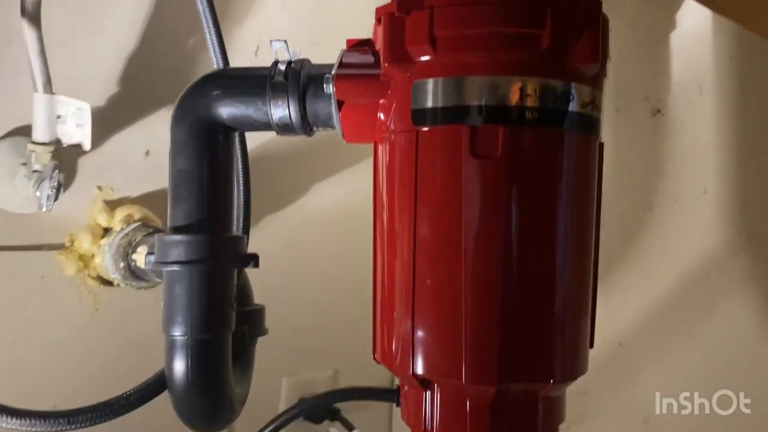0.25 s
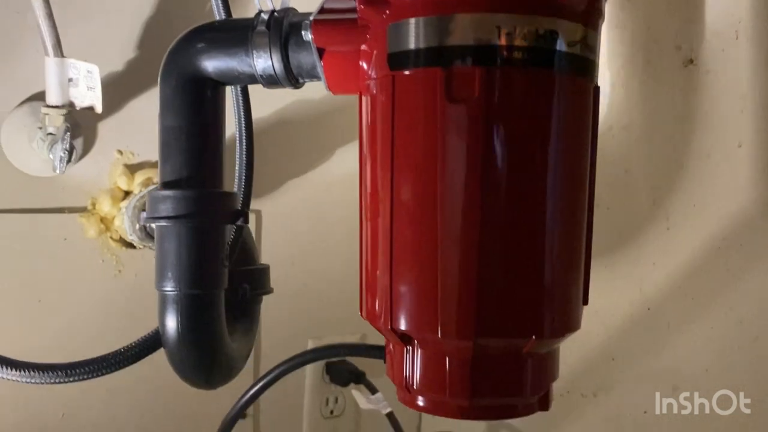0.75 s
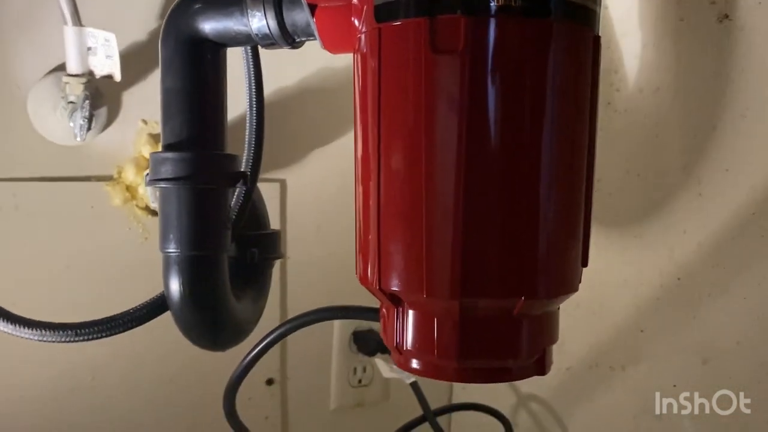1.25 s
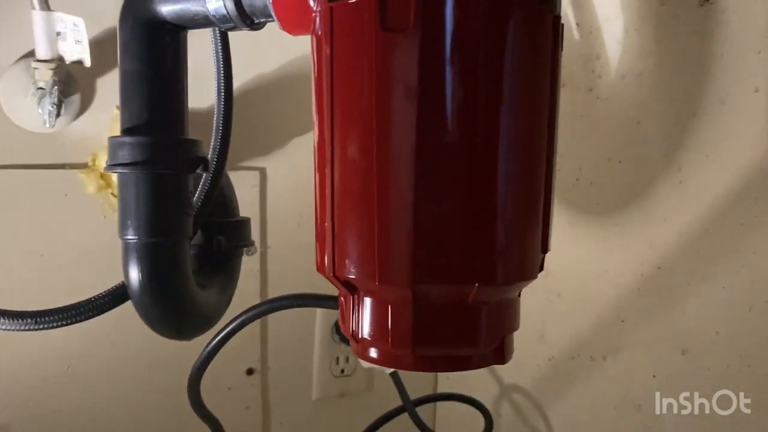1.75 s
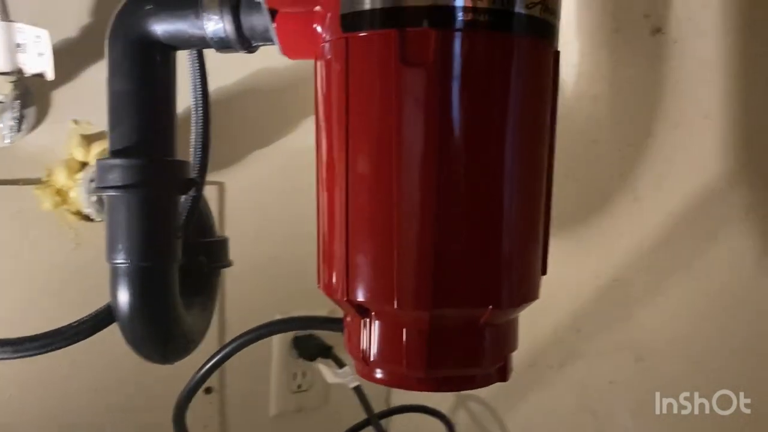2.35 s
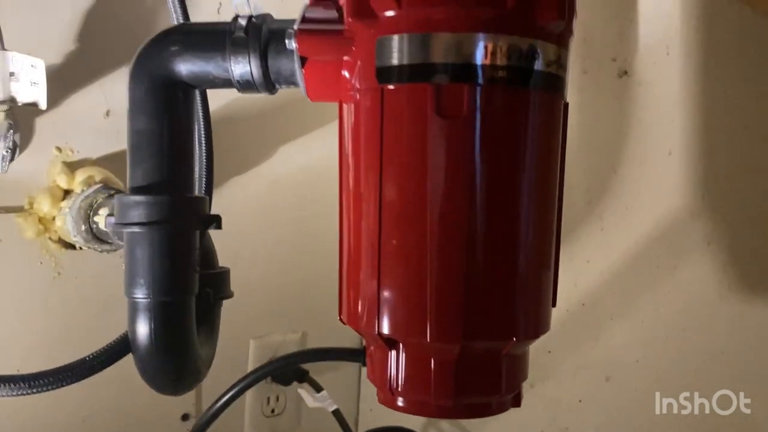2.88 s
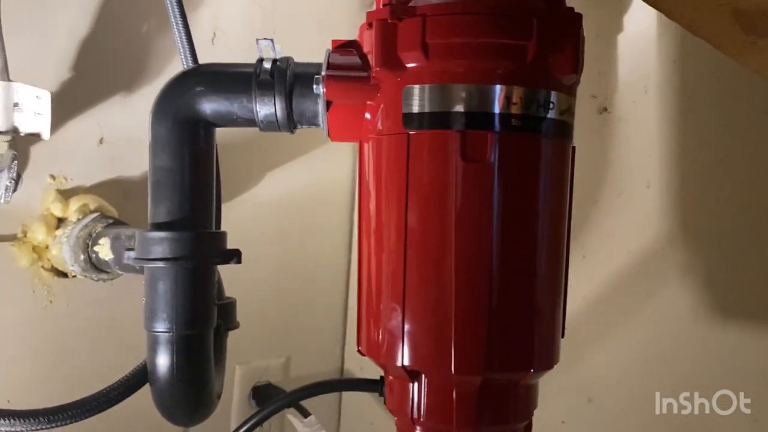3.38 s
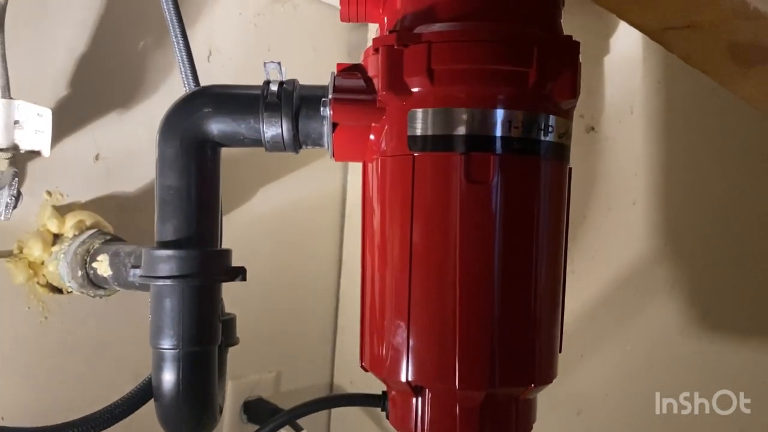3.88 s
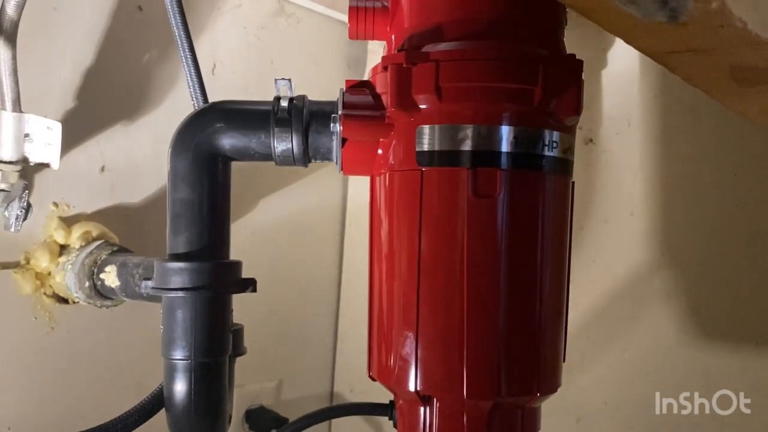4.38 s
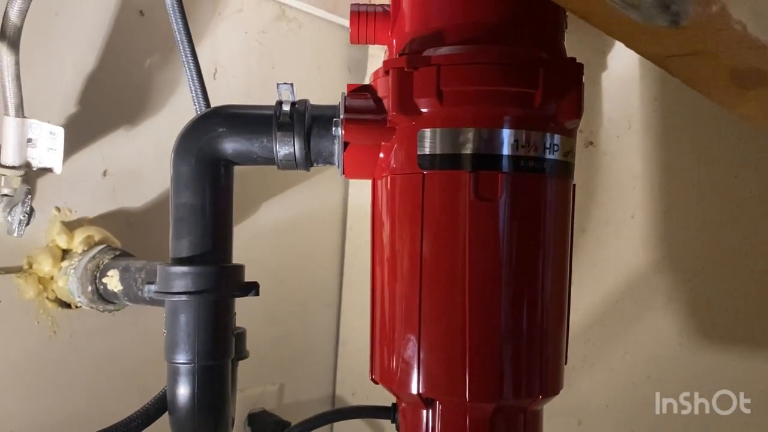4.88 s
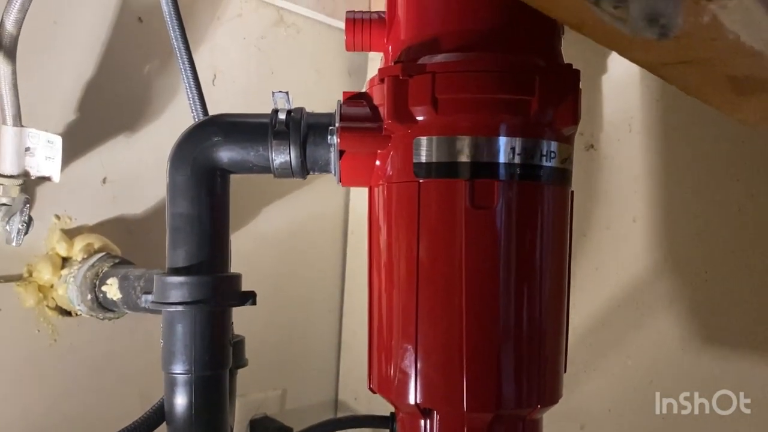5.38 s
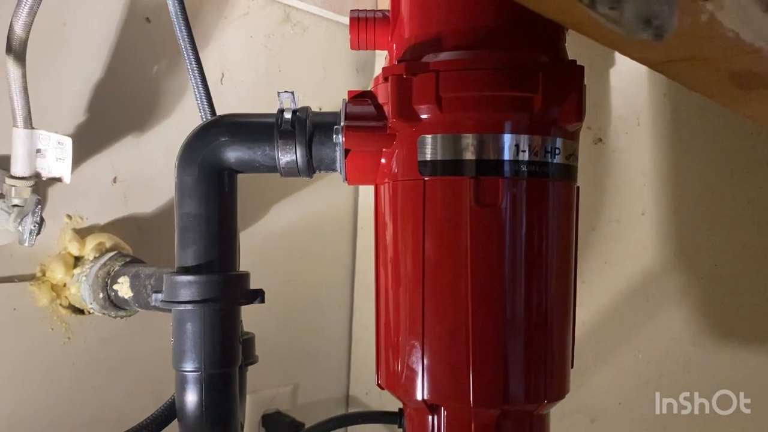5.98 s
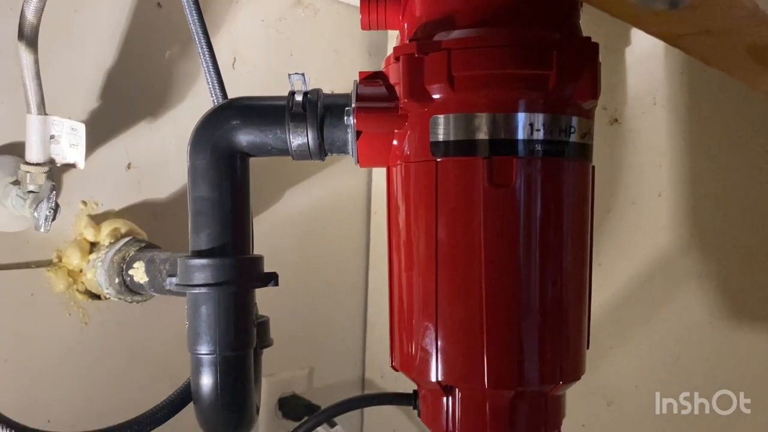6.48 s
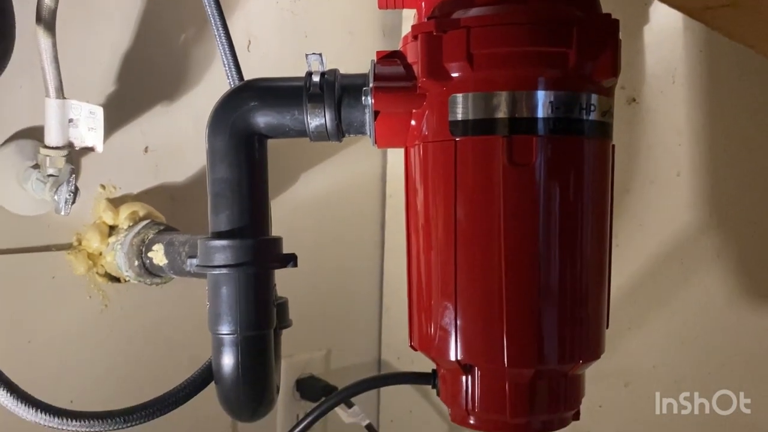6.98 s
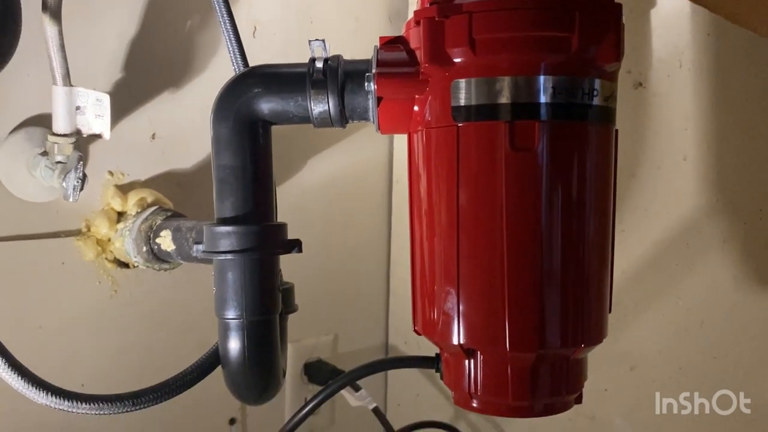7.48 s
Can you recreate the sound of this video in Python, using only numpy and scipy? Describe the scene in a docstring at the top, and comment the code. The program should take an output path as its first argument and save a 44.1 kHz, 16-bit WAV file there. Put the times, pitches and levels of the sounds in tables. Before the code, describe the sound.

From 0 s to the end near 7.7 s, a kitchen waste grinder runs continuously at nearly constant speed, heard very close in stereo inside a sink cabinet. A dominant low hum around 120 Hz throbs evenly about five times a second. Steady rotor tones sit above it, from low drones to a thin whine near 1500 Hz and higher, fluttering and shifting between sides as the microphone moves. Around 1-2.5 s, lowered towards the motor, it picks up more raspy, metallic brush noise; by 3-4 s this recedes. Water churns hollowly in the chamber with brief irregular gulps, under a constant bright rush and spray hiss that softens slightly later. A thin watery ring appears around 3.3 s. Low slugs thud down the drain, one near 2.5 s, then more frequently from 3.9 s, strongest around 5.2, 5.8 and 6.5 s, with the trap rumbling. It is still running at the end.

```python
"""Inside a kitchen sink cabinet, a waste grinder runs close to two microphones.
Its mains hum beats against the rotor's twice-a-turn push on the water and throbs about five times a second.
The rotor and its commutator whine in steady tones, and the brushes ring the motor shell with noise.
Filtered noise makes the water: it churns in the bowl, rings the chamber wall, sprays and rushes,
and drops in slugs down the drain and rumbles in the trap."""
import sys
import numpy as np
from scipy import signal
from scipy.fft import rfft, irfft
from scipy.io import wavfile
from scipy.ndimage import map_coordinates

SR = 44100
rng = np.random.default_rng(int(sys.argv[2]) if len(sys.argv) > 2 else 0)


def put_to_file(sound):
    """Save the sound as 16-bit audio at rate SR, in the file named by the first command-line argument."""
    columns = np.atleast_2d(sound).T  # one column per channel
    safe = np.clip(columns, -1, 1)
    whole_steps = np.round(safe * 32767)
    wavfile.write(sys.argv[1], SR, whole_steps.astype(np.int16))


N = 341334
T = np.arange(N) / SR
HZ = np.maximum(np.arange(N // 2 + 1) * SR / N, 1)   # 1 Hz at least, so that its logarithm exists

# path of the hand-held microphones: (time [s], height above the outlet pipe [m], sideways place [m])
MIC_PATH = [(0.0, 0.0094, -0.052), (0.5, -0.064, -0.066), (1.1, -0.13, -0.057), (1.85, -0.11, -0.074),
            (2.5, -0.097, -0.022), (3.0, -0.037, -0.012), (3.6, -0.0074, -0.0035), (4.3, 0.014, 0.014),
            (5.5, 0.0032, 0.081), (6.6, -0.025, 0.075), (7.74, -0.019, 0.065)]
# how alike the two microphones hear a sound: (frequency [Hz], likeness [-1 to 1])
MIC_LIKENESS = [(100, .98), (280, .87), (600, .58), (1250, .67), (2000, .32), (2700, .5), (3600, .42),
                (4500, .55), (5200, .12), (5900, .1), (6800, .85), (16000, .88)]


def from_db(db):
    """Turn decibels into gain."""
    return 10 ** (np.asarray(db) / 20)


def rms_one(x):
    """Scale to an average power of 1."""
    return x / np.sqrt(np.mean(x ** 2) + 1e-20)


def in_time(rows):
    """Draw straight lines between the rows of a table, giving each column at every sample."""
    s, *columns = np.transpose(rows)
    return [np.interp(T, s, c) for c in columns]


def at_hz(points, hz):
    """Read a table between its points, on a log-frequency axis."""
    f, value = np.transpose(points)
    return np.interp(np.log(hz), np.log(f), value)


def pan(lean_db):
    """Give left and right gains whose difference, left minus right, is lean_db."""
    return from_db(np.vstack([lean_db, -lean_db]) / 2)


def drift(rate):
    """Wander slowly at random around 0 with a spread of 1, changing about rate times a second."""
    step = 100   # samples between the random points
    r = np.exp(-2 * np.pi * rate * step / SR)
    noise = rng.standard_normal(N // step + 2002)
    slow = signal.lfilter([1], [1, -2 * r, r * r], noise)[2000:]   # drop the filter's start
    return np.interp(np.arange(N) / step, np.arange(len(slow)), rms_one(slow))


def swell(at_s, half_s):
    """Rise smoothly to 1 and fall again, as a bell curve."""
    return np.exp(-np.minimum(((T - at_s) / half_s) ** 2, 50))


def throb(turns, mains, left_lead):
    """Mains hum and the lugs' push lie about five hertz apart, so they swell and cancel in turn."""
    # housing shaken by the rectified mains: (multiple of the hum, level [dB], left minus right [dB])
    hum_parts = [(.5, -49, 2), (1, -25.45, 2.2), (2, -52, 1), (6, -54, 4)]
    paddle_db, paddle_db_per_m = -32.5, 10   # the push grows as the microphones rise to the grinding chamber
    lead = np.array([[left_lead], [0]])   # radians
    hum = sum(from_db(db) * pan(lean) * np.cos(2 * np.pi * k * mains + lead) for k, db, lean in hum_parts)
    height, _ = in_time(MIC_PATH)
    lug_gain = from_db(paddle_db + paddle_db_per_m * height) * pan(2.5)
    lugs = lug_gain * np.cos(2 * np.pi * 2 * turns + lead)   # two lugs push the water twice a turn
    return np.sqrt(2) * (hum + lugs)   # levels are rms


def whine(turns, mains):
    """Tones at multiples of the rotor speed, with the side tones that the pulsing supply adds."""
    # loudest tones, as the moving microphones cross their standing waves in the cabinet:
    # (multiple of the speed, multiple of the hum added):
    #     [(time [s], left level [dB], right level [dB], lead of the left phase [rad])]
    loud_tones = { (4, 0): [(0, -49, -43, 0), (1.1, -40.5, -38, .2), (2.3, -41, -39, .1),
                  (3.5, -37, -35.5, -.1), (4.5, -40, -37.5, 0), (5.7, -52, -50, .4), (6.5, -40, -42, .2),
                  (7.74, -41, -39.5, 0.055)], (5, 0): [(0, -49, -51, -.7), (2.4, -51, -61, -1.8),
                  (3.5, -36.5, -45, -.1), (4.8, -35, -43, -.1), (6.4, -33.5, -42, 0), (7.74, -39, -44, 0)],
                  (8, 0): [(0, -35, -48, -0.5), (1.8, -56, -43, 3), (2.9, -37, -60, 3),
                  (4.6, -42, -50, 0.5), (5.8, -41.5, -48, 1.5), (7.74, -42, -54, -3)],
                  (24, 0): [(0, -40, -38, .5), (.35, -45, -40, .7), (.7, -39.5, -34, 1.1),
                  (1.15, -34.5, -38.5, .8), (1.65, -33.5, -38.5, 0), (2.45, -37, -37, 1.6),
                  (3.0, -43, -35.5, 1.37), (3.7, -37.5, -37, -0.039), (4.4, -35, -36.5, -.1),
                  (6.2, -35.2, -40.5, -0.1), (7.74, -35.5, -39.5, -0.21)], (24, 1): [(0, -50, -36, 2.7),
                  (.6, -42, -40, 1.5), (.97, -39, -51, 2), (1.6, -35.7, -38, -1.5), (2.25, -37.3, -53, -.9),
                  (2.95, -52, -46, -1.5), (3.4, -42.5, -37.5, -1.5), (4.6, -41, -43, -1.4),
                  (7.74, -43.5, -42, -1)], (28, 0): [(0, -60, -49, 0), (.9, -41, -48, .3),
                  (1.9, -40, -47, .2), (2.8, -58, -52, 0), (3.7, -49, -49, -.8), (7.74, -48, -51, -.8)],
                  (36, 0): [(0, -51, -46, 3), (.5, -53, -48, 1), (1.1, -40, -37.5, -1),
                  (1.6, -42.5, -41, 0), (2.2, -42.5, -39.5, 0), (2.8, -52, -44, -2), (3.3, -41, -42, -1.5),
                  (4.4, -44, -49, -2), (5.3, -44, -60, -2.5), (7.74, -42, -58, 3)],
                  (48, 0): [(0, -61, -56, 1), (1.1, -44, -39.5, .7), (1.6, -49.5, -49, .1),
                  (2.35, -43.5, -39, 1.3), (3.1, -54, -48, 1), (4.0, -46, -44, 1.8), (5.0, -47, -45, 1.7),
                  (5.8, -42, -44.5, 1.4), (7.74, -45, -45, 1.7)], (60, 0): [(0, -56, -60, 0),
                  (3.0, -52, -57, 0), (5.2, -57, -63, 0), (6.0, -47, -58, .5), (7.74, -49, -59, .5)],
                  (96, 0): [(0, -64, -63, 0), (1.2, -44, -53, 0), (1.8, -52, -52, 0), (2.4, -48, -50, 0),
                  (3.2, -62, -61, 0), (4.9, -55, -52, 0), (7.74, -54, -57, 0)]}
    # fainter tones of the turning rotor: (multiple of the speed, level [dB], left minus right [dB])
    faint_tones = [(6, -43.5, 7), (7, -49.5, 5), (9, -54, 2), (10, -51.5, 9), (12, -56.0, 8),
                   (14, -57.0, 7), (16, -55, 9), (17, -56.0, 7), (22, -56, 3), (25, -58, 2), (29, -54.0, 7),
                   (31, -54.5, 0), (32, -53.0, 1), (33, -57, 5), (35, -58, 0), (37, -59, 6), (54, -60, 1),
                   (58, -57.5, 1), (66, -60, 3), (71, -59.5, 2), (72, -57, 0), (82, -62, 2), (95, -61, 0),
                   (120, -63, 0)]
    # fainter rotor and commutator tones, some chopped by the supply:
    # (multiple of the speed, multiple of the hum added, level [dB])
    side_tones = [(4, 1, -47), (12, 2, -54), (24, 2, -52), (24, -1, -57), (48, -1, -60), (72, -1, -61),
                  (84, 0, -61), (96, -1, -64), (240, 0, -67)]
    turn_hz = (turns[-1] - turns[0]) / T[-1]
    out = np.zeros((2, N))
    for (k, j), curve in loud_tones.items():
        left_db, right_db, lead = in_time(curve)
        level_db, lean_db = (left_db + right_db) / 2, left_db - right_db
        out += tone(k * turns + j * mains, k * turn_hz, level_db, lean_db, lead, flutter_db=0.5)
    for k, db, lean in faint_tones:
        apart = scattered(k * turn_hz, spread=2.4)
        out += tone(k * turns, k * turn_hz, db, lean, apart, flutter_db=0.8)
    for k, j, db in side_tones:
        apart = scattered(k * turn_hz, spread=2.0)
        out += tone(k * turns + j * mains, k * turn_hz, db, 1.6, apart, flutter_db=0.5)
    return out


def tone(cycles, hz, level_db, lean_db, apart, flutter_db):
    """A machine tone with a fluttering level, its phase at the left ahead by apart radians."""
    play_s = 2.2e-5 * drift(12)   # bearing play blurs the high tones most
    turned = cycles % 1 + hz * play_s + rng.random()
    phase = 2 * np.pi * turned + apart * np.array([[.5], [-.5]])
    gain = np.sqrt(2) * from_db(level_db + flutter_db * drift(5.2)) * pan(lean_db)
    return gain * np.cos(phase.astype(np.float32))


def scattered(hz, spread):
    """Wandering phase between the microphones [rad]; the less alike they hear, the more it wanders."""
    return spread * (1 - np.clip(at_hz(MIC_LIKENESS, hz), 0, 1)) * drift(0.17)


def brushes(turns):
    """Brushes scrape round the commutator and ring the motor shell."""
    # resonances of the motor shell: (frequency [Hz], width [Hz], relative level [dB])
    shell_modes = [(622, 136, 4.5), (1600, 110, 3), (1940, 30, 7), (2210, 150, 3.5)]
    shell_db, shell_db_per_m = -49, 82   # it grows as the microphones sink towards the motor
    height, _ = in_time(MIC_PATH)
    scrape = turbulence(turns, repeat=0.12, swirl=0.054)
    return from_db(shell_db - shell_db_per_m * height) * radiate(scrape, resonances(shell_modes))


def water(turns, mains):
    """Water thrown by the plate sets bowl and wall ringing, with a thin elbow ring and a hiss of spray."""
    # resonances of the water-filled bowl: (frequency [Hz], width [Hz], relative level [dB])
    bowl_modes = [(269.6, 30, 1.5), (296.5, 7.3, 2), (366, 57, 3.5), (450, 42, -1.5), (524, 93, -1),
                  (654.5, 36, -1.5), (792, 120, -10.5)]
    # the bowl's pitch shifts with the depth of water in it: (time [s], ratio to its usual pitch)
    bowl_pitch = [(0, 1.02), (1.2, 0.98), (2.1, .96), (3.0, 1.035), (4.3, 1.02), (5.5, 0.98), (7.74, 1.005)]
    # resonances of the chamber wall: (frequency [Hz], width [Hz], relative level [dB])
    wall_modes = [(925, 116, -8), (1107, 40, -0.5), (1164, 64, 3.5), (1225, 89, 3), (1292, 45, 2),
                  (1423, 150, -6), (4560, 220, -12.5)]
    # thin ring of the spray in the outlet elbow: (frequency [Hz], width [Hz], relative level [dB])
    elbow_modes = [(3365, 84, 0)]
    # level of that ring: (time [s], level [dB])
    elbow_level = [(0, -44), (.8, -56), (2.8, -73), (3.25, -43), (3.8, -46), (4.3, -52), (7.74, -46)]
    # colour of the spray hitting the housing: (frequency [Hz], relative level per Hz [dB])
    spray_colour = [(1500, 3.5), (2400, -1.5), (2750, 3.5), (3350, 3), (3950, 2.5), (4250, 1.5),
                    (4550, 0.5), (4900, -2.5), (5300, -7), (6000, -7.5), (9000, -44)]
    # colour of the even rush of water: (frequency [Hz], relative level per Hz [dB])
    rush_colour = [(20, -19), (60, -4), (200, -.5), (400, .5), (850, -2), (1900, -2), (2500, -4.5),
                   (5300, -5.3), (6200, -6), (8000, -8.5), (11000, -11.5), (16000, -12.8)]
    churn_db, ring_db, spray_db = water_levels()
    elbow_db, = in_time(elbow_level)
    _, sideways = in_time(MIC_PATH)
    surge_db = 0.36 * np.cos(2 * np.pi * (2 * turns - mains))   # churns harder on each swell of the hum

    bowl = radiate(turbulence(turns, repeat=0.01, swirl=0.093), resonances(bowl_modes))
    churn = from_db(churn_db + surge_db + 0.6 * drift(12.0)) * bend(bowl, bowl_pitch)
    wall = radiate(turbulence(turns, repeat=0.12, swirl=0.1), resonances(wall_modes))
    ring = from_db(ring_db + surge_db / 2 + 1.1 * drift(11.5)) * wall
    elbow = from_db(elbow_db) * radiate(rng.standard_normal((2, N)), resonances(elbow_modes))

    spray = radiate(splashes(depth_db=2.14, rate=24), from_db(at_hz(spray_colour, HZ)))
    spray = from_db(spray_db + 0.4 * drift(5.5)) * spray
    rush = radiate(turbulence(turns, repeat=.25, swirl=.05), from_db(at_hz(rush_colour, HZ)))
    rush = from_db(-33.2 + .45 * drift(16)) * rush
    hiss = cabinet(spray + rush, echo=0.17, top_echo=0.25, count=8)
    lean_db_per_m = 13   # the hiss leans to the left as the sideways place grows
    return churn + ring + elbow + pan(lean_db_per_m * sideways) * hiss


def water_levels():
    """Churn, wall ring and spray in dB: the slow flow, with each gulp changing the first two."""
    # slow levels: (time [s], churn in the bowl [dB], ring of the chamber wall [dB], spray [dB])
    slow_water = [(0, -32, -35, -34), (.8, -34, -35.5, -34.5), (1.9, -34.5, -38.5, -34.5),
                  (2.8, -35, -33, -35.5), (4.0, -34.5, -33, -36), (4.8, -33.5, -34.5, -36),
                  (6.4, -36, -34.5, -37.5), (7.74, -34, -34.5, -38)]
    # the plate catches a gulp of water; below 0 is a dip:
    # (time [s], rise of the churn [dB], rise of the wall's ring [dB])
    gulps = [(.27, 3, 1), (.68, 5.5, 0.5), (.92, -2, 3), (1.15, 4, 4), (1.56, 4, 1), (2.22, 4, 1),
             (2.38, 0, -1), (2.61, 3.5, 4), (3.01, 2.5, 2), (3.3, 3, -3), (3.54, 6, -1.5), (3.86, 4.5, 2),
             (4.25, 2, 1.5), (4.71, 2, -3), (5.2, 1.5, -1), (5.84, 4, 5), (6.7, -1, 4), (7.63, 5, -4)]
    churn_db, ring_db, spray_db = in_time(slow_water)
    for s, churn_rise_db, ring_rise_db in gulps:
        gulp = swell(s, half_s=0.025)
        churn_db = churn_db + churn_rise_db * gulp
        ring_db = ring_db + ring_rise_db * gulp
    return churn_db, ring_db, spray_db


def turbulence(turns, repeat, swirl):
    """Random force: a share comes round again each turn, and all of it pulses with the rotor."""
    size = 700   # random points round one turn
    place = (8 * (turns % 1 * size)).astype(int)   # eight finer steps to each point
    rings = [signal.resample(rng.standard_normal(size), 8 * size)[place] for _ in range(2)]
    pulsing = 1 + swirl * sum(np.cos(2 * np.pi * k * turns) for k in range(1, 4))
    return (rng.standard_normal((2, N)) + repeat * np.array(rings)) * pulsing


def splashes(depth_db, rate):
    """The spray comes in small uneven splashes, each frequency region flaring by itself."""
    edges = np.geomspace(1500, 16000, 9)   # Hz
    white = rfft(rng.standard_normal((2, N)))
    out = np.zeros((2, N))
    for low, high in zip(edges, edges[1:]):
        band = irfft(white * ((HZ >= low) & (HZ < high)), N)
        out += band * from_db(depth_db * drift(rate))
    return out


def bend(x, pitch):
    """Slide all the pitches of a sound together, by playing it faster or slower."""
    ratio, = in_time(pitch)
    return np.array([map_coordinates(side, [np.cumsum(ratio)], order=1, mode="mirror") for side in x])


def drain(turns):
    """Slugs of water unbalance the plate, shaking it once a turn, and thump down the pipe into the trap."""
    # resonance of the drain pipe: (frequency [Hz], width [Hz], relative level [dB])
    pipe_modes = [(64, 22, 0)]
    # resonances of the trap: (frequency [Hz], width [Hz], relative level [dB])
    trap_modes = [(85.5, 16, 1.5), (124, 41, -0.5)]
    trap_db, trap_follows = -40.5, 0.3   # the second is the share of the flow's swing in dB that it takes up
    flow = drain_flow()
    wobble = np.sqrt(2) * flow * from_db(-1.5) * pan(2.5) * np.cos(2 * np.pi * turns)
    slugs = flow * from_db(-1.0) * radiate(rng.standard_normal((2, N)), resonances(pipe_modes))
    trap_gain = from_db(trap_db) * (flow / flow.mean()) ** trap_follows
    rumble = trap_gain * radiate(rng.standard_normal((2, N)), resonances(trap_modes))
    return wobble + slugs + rumble


def drain_flow():
    """Strength of the flow down the drain: an uneven trickle, with slugs on top."""
    # flow between slugs, before its waver: (time [s], level [dB])
    trickle_level = [(0, -49), (1.2, -48), (2.0, -45), (3.0, -44), (4.0, -44.5), (6.5, -48), (7.74, -43)]
    # slugs of water drop down the drain: (time [s], peak level before the trim below [dB])
    slug_peaks = [(0.52, -46), (2.51, -37), (3.9, -43), (4.28, -40), (4.85, -39), (5.19, -33), (5.56, -41),
                  (5.84, -32), (6.08, -36), (6.5, -31), (6.77, -41), (7.35, -43)]
    trim_db = -2
    trickle_db, = in_time(trickle_level)
    trickle = from_db(trickle_db + 0.5 * drift(5))
    slug_power = sum(from_db(db + trim_db) ** 2 * swell(s, half_s=0.058) for s, db in slug_peaks)
    return np.sqrt(trickle ** 2 + slug_power)


def resonances(modes):
    """Gain at each frequency of a set of steep-sided resonances, their powers added."""
    power = 0
    for hz, width, db in modes:
        peak = from_db(db) / (1 + (2 * (HZ - hz) / width) ** 2)
        power = power + peak ** 2
    return np.sqrt(power)


def radiate(force, gain):
    """Colour two random forces and mix them so the microphones hear each frequency more or less alike."""
    # loudness between the sides: (frequency [Hz], left minus right [dB])
    side_lean = [(60, 2), (250, 1.5), (400, 3.5), (700, 7), (1200, 4), (1800, 2.2), (3000, 1.6),
                 (6000, 0.2), (16000, 0)]
    lag_above_hz, left_lag_s = 7020, .000242   # the top reaches the left microphone a little later
    mid, side = rfft(force) * gain
    alike = np.clip(at_hz(MIC_LIKENESS, HZ), -1, 1)
    both = np.sqrt(1 + alike) * mid + np.sqrt(1 - alike) * side * [[1], [-1]]
    both[0] *= np.exp(-2j * np.pi * np.maximum(HZ - lag_above_hz, 0) * left_lag_s)
    return rms_one(irfft(both * pan(at_hz(side_lean, HZ)), N))


def cabinet(x, echo, top_echo, count):
    """Wall echoes comb the treble, the very top alike on both sides; delays slide as the microphones move."""
    height, _ = in_time(MIC_PATH)

    def combed(part, gain, count):
        """Add sliding echoes, then scale to keep the power about the same."""
        out = part.copy()
        paths = rng.uniform(.4, 2.4, count)   # extra way of each echo [m]
        slants = rng.uniform(-1, 1, count)   # change of that way per metre of height
        for path, slant in zip(paths, slants):
            at = np.arange(N) - (path + slant * height) / 343 * SR   # sound travels 343 m/s
            late = np.array([map_coordinates(side, [at], order=3, mode="mirror") for side in part])
            out += gain * rng.choice([-1, 1]) * late
        return out / np.sqrt(1 + count * gain ** 2)

    spectrum = rfft(x)
    middle = irfft(spectrum * ((HZ >= 1400) & (HZ < 6500)), N)
    top = irfft(spectrum * (HZ >= 6500), N)
    apart = np.vstack([combed(side[None], echo, count) for side in middle])   # own echoes on each side
    return x - middle - top + apart + combed(top, top_echo, count // 2)


def scene():
    """One rotor drives the machine and its water; its speed trembles as the water drags on it."""
    # rotor speed under the changing water load, before the tremble: (time [s], speed [turns per minute])
    rotor_speed = [(0.0, 3751.2), (0.85, 3755.5), (1.15, 3765.7), (1.3, 3757.5), (1.5, 3766.4),
                   (1.8, 3752.1), (2.8, 3758.1), (3.05, 3754.4), (3.3, 3759.3), (3.55, 3748.5),
                   (4.2, 3755.7), (4.72, 3736.1), (5.3, 3744.3), (5.9, 3747.7), (6.15, 3745.2),
                   (6.45, 3751.9), (7.0, 3749.2), (7.74, 3747.4)]
    hum_hz, first_throb_s = 119.9, .062   # hum and lugs line up at this moment
    hum_db_per_m, lean_db_per_m = 3, 14   # the hum grows and leans left as the sideways place grows
    rpm, = in_time(rotor_speed)
    _, sideways = in_time(MIC_PATH)
    turns = np.cumsum(rpm + 1.8 * drift(22)) / 60 / SR
    turns = turns - np.interp(first_throb_s, T, turns)
    mains = hum_hz * (T - first_throb_s)   # cycles of the hum
    hum_gain = from_db(hum_db_per_m * sideways) * pan(lean_db_per_m * sideways)
    hum = hum_gain * throb(turns, mains, left_lead=0.23)
    return hum + whine(turns, mains) + brushes(turns) + drain(turns) + water(turns, mains)


def record(dry):
    """Cut the top steeply above 15720 Hz."""
    return signal.sosfilt(signal.ellip(12, .1, 90, 15720, fs=SR, output="sos"), dry)


dry = scene()
out = record(dry)
put_to_file(out)
```